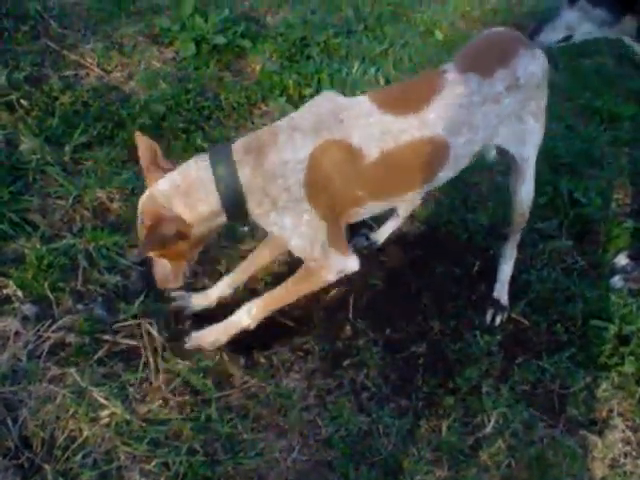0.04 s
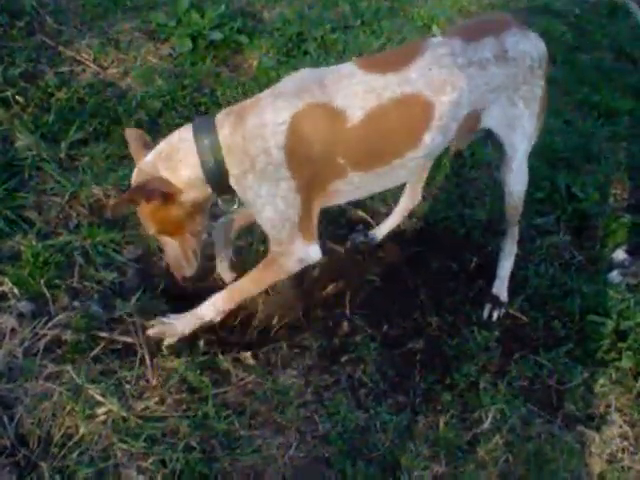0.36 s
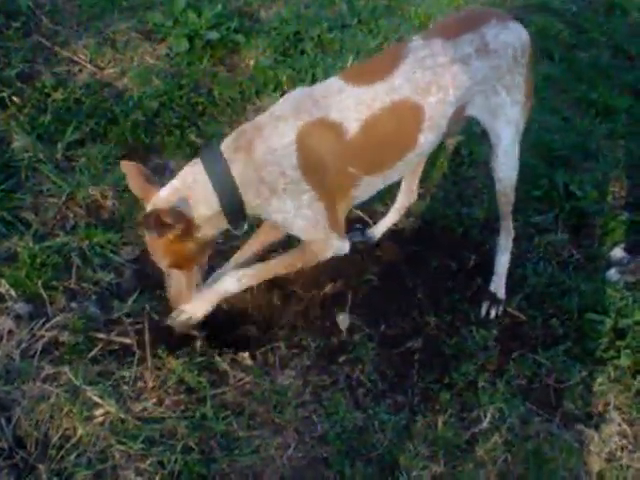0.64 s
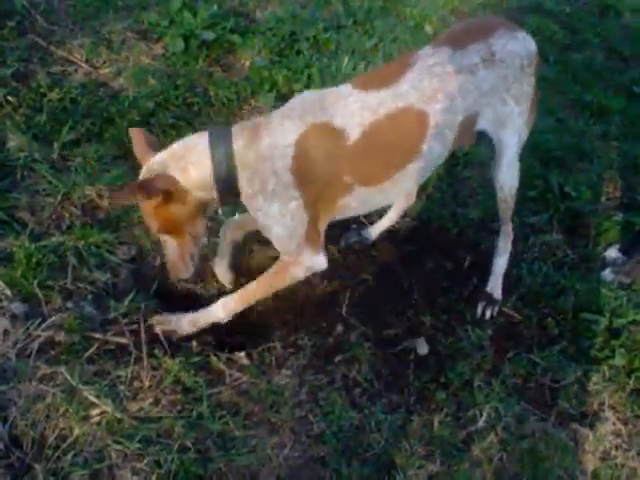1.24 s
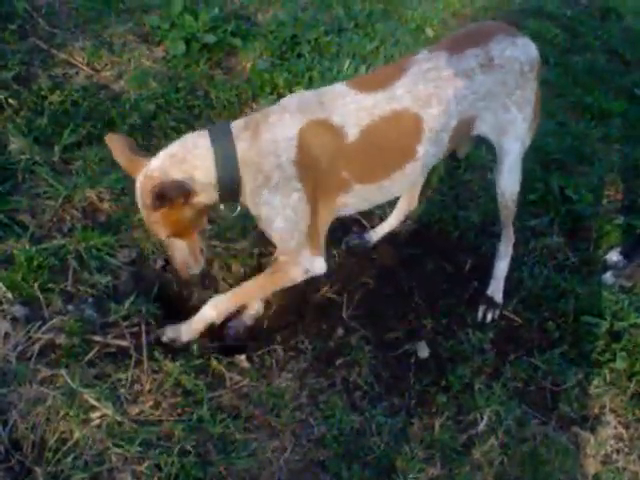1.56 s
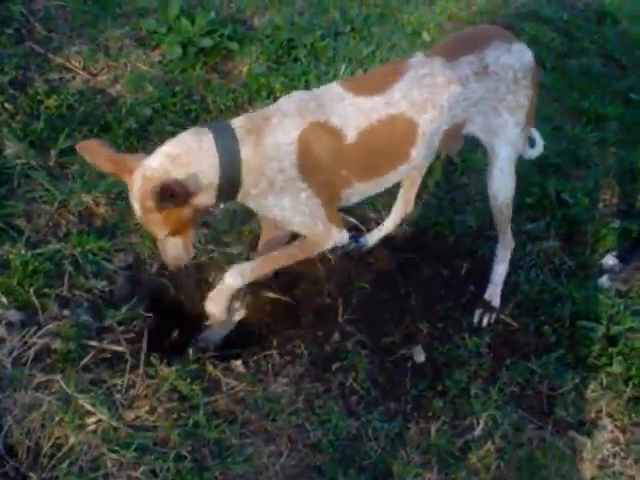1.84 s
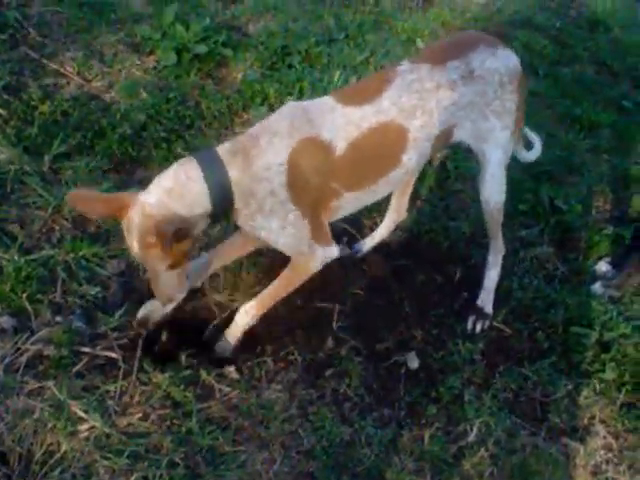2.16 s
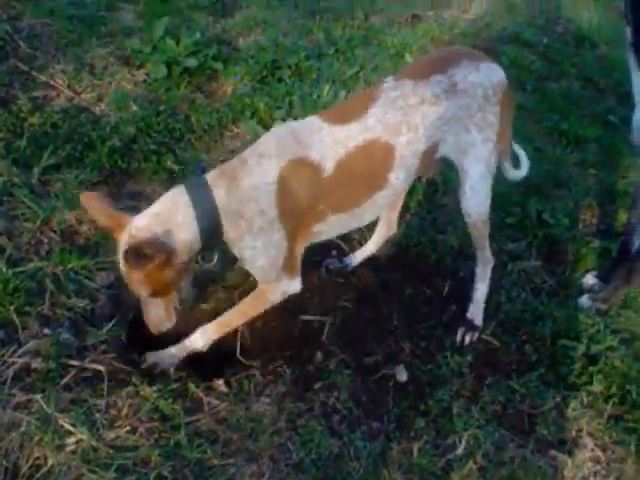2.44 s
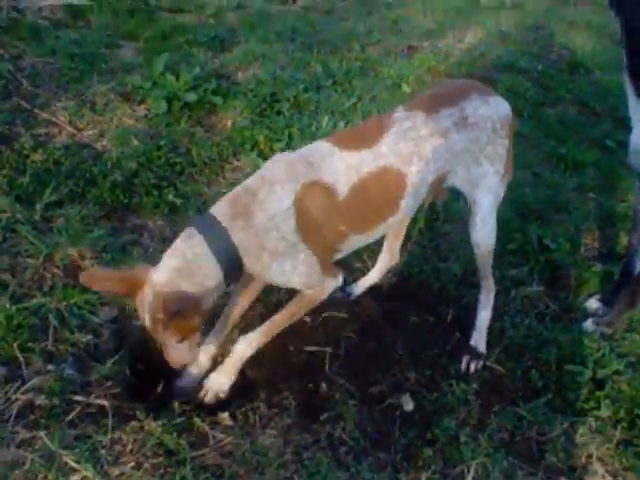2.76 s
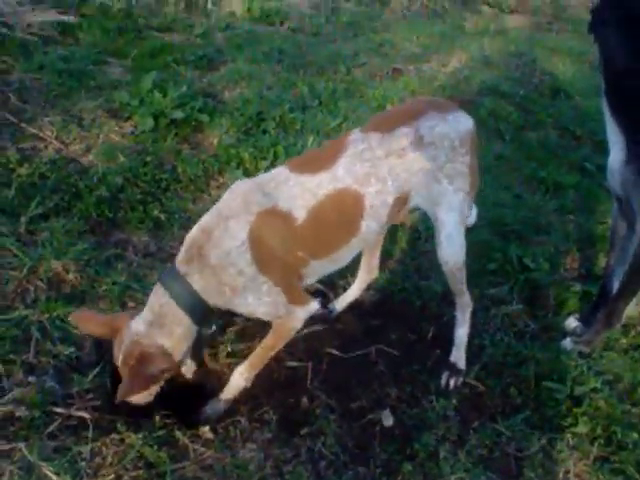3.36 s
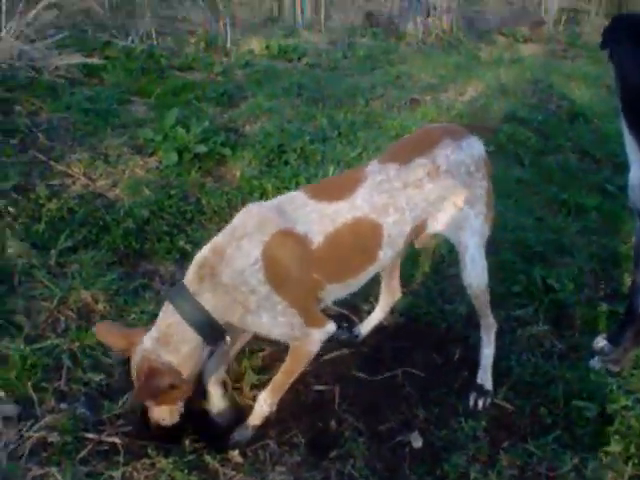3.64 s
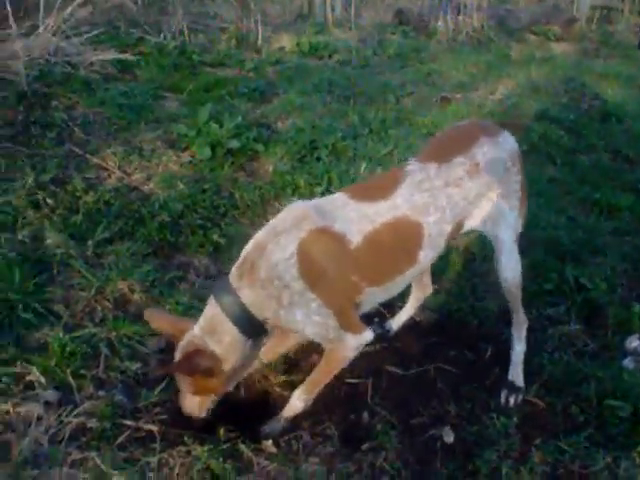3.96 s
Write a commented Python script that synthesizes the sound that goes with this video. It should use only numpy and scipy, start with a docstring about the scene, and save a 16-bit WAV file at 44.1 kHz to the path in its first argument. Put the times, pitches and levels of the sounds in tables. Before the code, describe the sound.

A dog digs in a lawn close to the microphone, its paws raking crumbly soil in quick strokes. Earth trickles, small roots snap and the dog sniffs briefly, then drags out one longer pawful. Low wind blows behind.

```python
"""A dog digging in a lawn

Close by, a dog's forepaws rake crumbling soil about five times a second and loose earth trickles back.
Rootlets snap, a thicker root and a twig break. The dog sniffs in the hole, makes one hollow clop and
drags out a long pawful. Behind it a low, hollow wind swells and sinks over a faint hiss and a thin whine."""
import sys
import numpy as np
from scipy import signal
from scipy.fft import rfft, irfft
from scipy.io import wavfile
from scipy.ndimage import uniform_filter1d

SR = 44100
rng = np.random.default_rng(int(sys.argv[2]) if len(sys.argv) > 2 else 0)


def output_pcm(signal):
    """Save a mono or channel-first signal as 16-bit PCM at the path in sys.argv[1].

    Samples are clipped to [-1, 1] before scaling.
    """
    pcm = np.clip(np.atleast_2d(signal).T, -1, 1) * 32767
    wavfile.write(sys.argv[1], SR, np.round(pcm).astype(np.int16))


N = 176400  # 4 seconds
SAND_HZ = 5000  # fine sand sounds above this, coarser soil below


def undb(db):
    """Turn decibels into a number to multiply by."""
    return 10 ** (np.asarray(db) / 20)


def unit(x):
    """Scale a signal to an average strength (rms) of 1."""
    return x / np.sqrt(np.mean(x ** 2))


def curve(rows, column=1):
    """Glide from row to row of a timed table, one value per sample."""
    rows = np.array(rows)
    return np.interp(np.arange(N) / SR, rows[:, 0], rows[:, column])


def colour(x, points):
    """Shape the bass and treble with (f/Hz, level/dB) points; rms 1."""
    hz, db = np.array(points).T
    f = np.arange(N // 2 + 1) * SR / N + 1
    gain = undb(np.interp(np.log(f), np.log(hz), db))
    return unit(irfft(rfft(x) * gain, N))


def band(x, hz, width):
    """A resonance: it lets through the sound near one pitch."""
    q = max(hz / width, hz / (SR / 4))
    return signal.lfilter(*signal.iirpeak(hz, q, fs=SR), x)


def soften(x, soft_hz):
    """Dull the treble."""
    return signal.sosfilt(signal.butter(2, soft_hz, fs=SR, output="sos"), x)


def high_pass(x, low_hz):
    """Take out the bass."""
    return signal.sosfilt(signal.butter(2, low_hz, "high", fs=SR, output="sos"), x)


def waver(per_s):
    """Glide to a new random value per_s times a second; rms 1."""
    hold = int(SR / per_s)
    steps = np.repeat(rng.standard_normal(N // hold + 1), hold)
    return unit(uniform_filter1d(steps, hold)[:N])


def envelope(start, length, attack, release):
    """Loudness that rises, holds and dies away; times in seconds."""
    t = np.arange(N) / SR - start
    rise = np.clip(t / attack + .5, 0, 1)
    return rise * np.exp(-np.maximum(t - length + release / 2, 0) / release)


def add(out, at, x):
    """Mix x into out, starting at a time in seconds."""
    i = max(int(at * SR), 0)
    out[i:i + len(x)] += x[:N - i]


def rush(peaks):
    """Air rushing through steep (f/Hz, width/Hz, level/dB) resonances; rms 1."""
    out = np.zeros(N)
    for hz, width, db in peaks:
        wider = 1.67 * width  # filtering twice narrows it again
        out += undb(db) * band(band(rng.standard_normal(N), hz, wider), hz, wider)
    return unit(out)


def ring(tones, tilt_db=0):
    """Tones ring after a blow, each falling 60 dB in its fade time; peak 1."""
    t = np.arange(SR // 10) / SR
    y = np.zeros(len(t))
    for hz, db, fade in tones:
        gain = undb(db + tilt_db * np.log2(hz / tones[0][0]))
        y += gain * np.sin(2 * np.pi * hz * t) * np.exp(-np.log(1000) * t / fade)
    return y / np.abs(y).max()


def crumbs(per_s, spread_db):
    """Tiny fractures in ten sizes, each size clicking per_s times a second at its own pitch; rms 1."""
    out = np.zeros(N)
    for hz in np.geomspace(520, 9800, 10):
        clicks = (rng.random(N) < per_s / SR) * rng.choice([-1, 1], N)
        strength = undb(spread_db * np.minimum(rng.exponential(size=N), 4))  # a few are much louder
        out += band(clicks * strength, hz, width=hz / 2.8)
    return unit(out)


def whine():
    """A faint, steady, high band of sound, like far insects."""
    return undb(-68) * rush([(8090, 70, 0)])


# How the wind swells: t/s, then level/dB of its low, middle and upper resonances
GUSTS = [(0, -36, -33.5, -43), (.1, -47, -35.5, -49), (.3, -42, -37.5, -44), (.55, -38.5, -49, -47),
         (.72, -31.5, -34, -46), (.88, -36, -35, -37.5), (1.02, -32.5, -27.5, -42), (1.18, -26, -27, -35.5),
         (1.35, -31.5, -27, -34), (1.55, -24, -29, -36), (1.72, -31, -37.5, -38.5), (1.92, -32, -30.5, -43),
         (2.1, -40.5, -39.5, -38), (2.3, -35, -34.5, -47), (2.56, -33.5, -39, -42), (2.68, -36.5, -41, -47),
         (2.8, -39, -30.5, -41.5), (2.92, -42.5, -37.5, -45.5), (3.04, -36.5, -33, -46.5),
         (3.25, -42, -39.5, -44), (3.48, -42.5, -44, -48), (3.7, -39, -37.5, -45),
         (3.97, -32.5, -41, -40.5)]
# Those three groups of resonances: f/Hz, width/Hz, relative level/dB
WIND_LOW = [(138.4, 27, -11), (185.4, 40, -1.5), (223, 18, -9.5)]
WIND_MIDDLE = [(314.5, 26.6, 2.5), (354.6, 50.4, 3)]
WIND_UPPER = [(499.5, 41, 0), (681, 35.7, -9.5)]
# Tone colour of the low rumble and of the outdoor hiss: f/Hz, relative level/dB
RUMBLE_COLOUR = [(25, -19), (45, -15), (70, -5), (90, -9), (125, 4), (200, -2), (260, -3), (420, -3),
                 (600, -16), (800, -18), (1200, -23), (2500, -77)]
HISS_COLOUR = [(200, -13), (700, 28), (1200, 19), (2200, 19), (4500, 8.5), (6500, -14), (8300, -4),
               (10000, -8)]
def wind():
    """Hollow resonances swell and sink over a rumble that follows them loosely, and a faint hiss."""
    levels = [curve(GUSTS, column) for column in (1, 2, 3)]
    groups = (WIND_LOW, WIND_MIDDLE, WIND_UPPER)
    hollow = sum(undb(db - .5) * rush(peaks) for db, peaks in zip(levels, groups))
    swell_db = np.mean(levels, axis=0) - np.mean(levels)
    rumble = undb(-40 + .11 * swell_db) * colour(rng.standard_normal(N), RUMBLE_COLOUR)
    hiss = undb(-55) * colour(rng.standard_normal(N), HISS_COLOUR)
    return hollow + rumble + hiss


# Tone colour of falling earth: f/Hz, relative level/dB
TRICKLE_COLOUR = [(500, -10), (1200, -3), (2600, 4), (4500, 2), (7000, 4), (10000, 0.5)]
def trickle():
    """Loose earth falls back all the while: crumbs fairly evenly, fine sand in fits."""
    coarse, fine = (colour(crumbs(per_s=500, spread_db=2.8), TRICKLE_COLOUR) for _ in range(2))
    coarse = soften(coarse, SAND_HZ) * undb(1.8 * waver(per_s=35))
    fine = high_pass(fine, SAND_HZ) * undb(3.5 * waver(per_s=35))
    return undb(-54.5) * (coarse + fine)


# Tone colour of crumbling soil: f/Hz, relative level/dB
SOIL_COLOUR = [(200, -28), (500, 2.5), (1000, 4), (1600, 0.5), (2500, 3.5), (3500, -1), (4800, -3),
               (7500, 2), (10000, -2.5)]
def earthy(x):
    """Make a noise sound like crumbling soil; rms 1."""
    return colour(x, SOIL_COLOUR)


# Each sniff: t/s, length/s, level/dB, lowest resonance f/Hz
SNIFF_PUFFS = [(2.506, 0.026, -55, 1080), (2.636, 0.015, -39, 1070), (2.668, 0.044, -38.5, 1080),
               (3.562, 0.053, -39.5, 940), (3.626, 0.035, -42.5, 980)]
# The higher resonances of the nose: f/Hz, width/Hz, relative level/dB
NOSE_PEAKS = [(1600, 190, -18), (3140, 460, -7), (4470, 3100, -23.5)]
def sniffs():
    """Puffs of air pass through the resonances of the dog's nose and stir the loose soil."""
    out = np.zeros(N)
    for at, length, db, hz in SNIFF_PUFFS:
        breath = rush([(hz, 250, 0)] + list(NOSE_PEAKS))
        stirred = undb(-12) * unit(soften(earthy(rng.standard_normal(N)), SAND_HZ))
        out += undb(db) * envelope(at, length, attack=.012, release=.014) * unit(breath + stirred)
    return out


# Rootlets and dry stems snapping: t/s, relative level/dB, f/Hz
ROOTLET_SNAPS = [(0.023, -19.5, 1300), (0.081, -18, 2180), (0.098, -30, 3000), (0.108, -28, 2700),
                 (0.136, -20, 2000), (0.166, -22.5, 8000), (.250, -25.5, 2520), (0.308, -14.5, 3400),
                 (0.315, -21, 1680), (0.333, -21, 1580), (0.347, -17.5, 1180), (.435, -16, 7000),
                 (0.46, -21, 6650), (0.4804, -9.5, 3140), (0.706, -28, 1200), (.742, -21.5, 7000),
                 (0.755, -21.5, 3600), (0.848, -35, 2200), (0.912, -26, 2980), (0.9321, -16.5, 2820),
                 (0.973, -20.5, 3600), (1.011, -33, 2200), (1.12, -29.5, 4000), (1.209, -22.5, 9000),
                 (1.317, -22, 5500), (1.323, -25, 2930), (1.34, -20, 2780), (1.531, -21.5, 3300),
                 (1.682, -26.5, 5000), (1.843, -19.5, 4500), (1.869, -16, 4060), (1.893, -27, 2600),
                 (1.99, -18.5, 6400), (2.099, -18, 2800), (2.1105, -12.5, 7600), (2.124, -27, 5000),
                 (2.133, -13.5, 3250), (2.308, -32, 4000), (2.342, -25, 2970), (2.3712, -16.5, 8350),
                 (2.5433, -23.5, 2220), (2.758, -25, 1270), (2.9957, -17, 7150), (3.407, -23, 5000),
                 (3.415, -26, 4500), (3.491, -29, 4030)]
def rootlets():
    """Each snap is a millisecond burst in a broad resonance, with a tail of splinters."""
    out, t = np.zeros(N), np.arange(SR // 20) / SR
    splinters = undb(-16) * np.exp(-t / .004)
    shape = np.minimum(t / .0008, 1) * (np.exp(-t / .0013) + splinters)
    for at, db, hz in ROOTLET_SNAPS:
        burst = band(rng.choice([-1, 1], len(t)) * shape, hz, width=4 * hz)
        snap = soften(burst, 2 * hz) + .72 * burst  # some undulled burst keeps the edge sharp
        add(out, at, undb(db - 26) * unit(snap))
    return out


# A thick root giving way: t/s, crack level/dB, thud level/dB, crack's treble limit f/Hz
ROOT_BREAKS = [(0.4837, -6.5, -12, 6500), (0.5037, -7, -27, 3700)]
# Tones of the root's crack, its thud and the twig: f/Hz, relative level/dB, fade/s
CRACK_TONES = [(1230, -13, 0.0043), (1870, 15, 0.0015), (3300, -12, 0.0021)]
THUD_TONES = [(350, 7.5, 0.021), (724, -21, 0.013), (1020, -1.5, 0.026)]
TWIG_TONES = [(980, -7, 0.038), (1190, -4.5, 0.017), (1750, -7, 0.024), (3150, 2, 0.015),
              (3560, -13, 0.011), (5040, -12, 0.013), (6800, -21, 0.0089), (8070, -6, 0.02),
              (8650, -7, 0.017)]
def root_and_twig():
    """A root cracks twice and thuds in the ground; later a dry twig breaks."""
    out = np.zeros(N)
    for at, crack_db, thud_db, soft_hz in ROOT_BREAKS:
        crack = undb(crack_db) * soften(ring(CRACK_TONES), soft_hz)
        add(out, at, crack + undb(thud_db) * ring(THUD_TONES))
    add(out, 2.9958, undb(-16) * ring(TWIG_TONES))
    return high_pass(out, low_hz=260)


# The clop's two contacts: t/s, level/dB before filtering, brightness/dB per octave
CLOP_CONTACTS = [(3.365, -5, -19.5), (3.3699, -1.5, 6)]
# Its hollow ring: f/Hz, relative level/dB, fade/s
CLOP_TONES = [(726, -12, 0.044), (890, -7, 0.051), (1097, 6, 0.036), (1436, 1, 0.021), (1554, 8.5, 0.018),
              (1860, 3.5, 0.016), (2380, -13, 0.014), (2790, -13, 0.019), (3400, -15, 0.018),
              (4040, -12, .009), (5250, -15, 0.0062)]
def clop():
    """A dull contact and a bright one come so close together that they make one hollow clop."""
    out, rise_s = np.zeros(N), .0012
    for at, db, tilt in CLOP_CONTACTS:
        tones = ring(CLOP_TONES, tilt)
        rise = np.minimum(np.arange(len(tones)) / SR / rise_s, 1)
        add(out, at, undb(db) * tones * rise)
    return soften(high_pass(out, low_hz=660), soft_hz=4200)


def raked_soil(dust_db, roughness):
    """Clods, grit and sand crumble low, middle and high, in spurts as the claws catch and slip."""
    spurts_db = 2 * waver(per_s=160)
    earth = earthy(crumbs(per_s=380, spread_db=3.6) + undb(dust_db) * rng.standard_normal(N))
    clods = signal.sosfiltfilt(signal.butter(2, 2000, fs=SR, output="sos"), earth)
    sand = signal.sosfiltfilt(signal.butter(2, SAND_HZ, "high", fs=SR, output="sos"), earth)
    grit = earth - clods - sand
    layers = []
    for grains in (clods, grit, sand):
        flicker_db = 2.5 * waver(per_s=70)
        loudness = unit(undb(roughness * (spurts_db + flicker_db)))
        layers.append(undb(-.73) * grains * loudness)
    return layers


def mix_soil(layers, tilt_db):
    """Join the three layers; more sand and fewer clods sound brighter."""
    clods, grit, sand = layers
    gain = undb(tilt_db * 1.5)  # the layers lie about 1.5 octaves apart
    return clods / gain + grit + sand * gain


# Each paw stroke: t/s, length/s, relative level/dB, brightness/dB per octave
PAW_STROKES = [(0, 0.12, -44.5, 2), (0.077, 0.077, -40.5, 0), (0.152, 0.082, -58, 8),
               (0.343, 0.017, -40, -5), (0.33, 0.087, -46, 3.5), (0.426, 0.023, -43, -6),
               (0.458, 0.022, -28.5, 1), (0.557, 0.034, -45.5, 0.5), (0.702, .06, -48.5, -2),
               (0.846, 0.022, -46, -1.5), (0.918, 0.029, -40, -2), (0.959, 0.028, -38, 0.5),
               (1.106, 0.011, -44, -2), (1.139, 0.049, -43.5, 1.5), (1.301, 0.074, -40.5, -1.5),
               (1.45, 0.037, -42.5, -1.5), (1.539, 0.047, -44.5, 2.5), (1.619, 0.097, -43, -1),
               (1.711, 0.07, -38.5, -0.5), (1.794, 0.134, -43.5, -1.5), (2.03, 0.054, -44.5, -2),
               (2.104, 0.025, -36, -3), (2.163, 0.06, -53, 5.5), (2.304, 0.057, -38.5, 0),
               (2.543, 0.043, -39, 0.5), (2.752, 0.055, -44.5, -1), (2.865, 0.016, -43.5, -0.5),
               (3.224, 0.1, -49, -2), (3.404, 0.12, -51, -1)]
# The course of the long drag: t/s, relative level/dB, brightness/dB per octave
PAW_DRAG = [(3.6, -52, 1), (3.675, -43.5, 1), (3.69, -35.5, -2), (3.77, -34.5, 0), (3.815, -28.5, 1.5),
            (3.86, -33, 2), (3.885, -38.5, -1), (3.96, -44, 2), (4, -51, 0)]
def paws():
    """The forepaws rake the soil in short strokes, then make one long, smoother drag."""
    rough = raked_soil(dust_db=-7.5, roughness=1)
    strokes = np.zeros(N)
    for at, length, db, tilt in PAW_STROKES:
        strokes += undb(db) * envelope(at, length, attack=.004, release=.008) * mix_soil(rough, tilt)
    smooth = raked_soil(dust_db=0, roughness=.44)
    dragging = np.arange(N) / SR > PAW_DRAG[0][0]
    drag = undb(curve(PAW_DRAG)) * dragging * mix_soil(smooth, curve(PAW_DRAG, column=2))
    return strokes + drag


def scene():
    """The digging in front of the wind, in one channel."""
    digging = paws() + trickle() + rootlets() + root_and_twig() + clop() + sniffs()
    return (digging + wind() + whine())[None]


def record(dry):
    """Cut the treble steeply above 10000 Hz."""
    return signal.sosfilt(signal.ellip(8, .2, 70, 10000, fs=SR, output="sos"), dry)


dry = scene()
out = record(dry)
output_pcm(out)
```